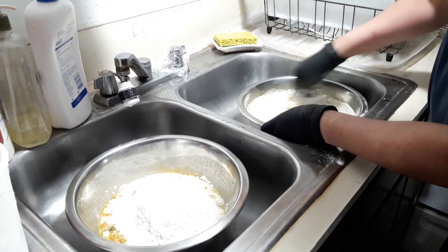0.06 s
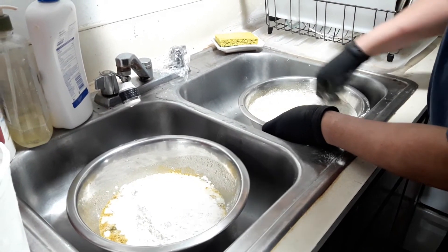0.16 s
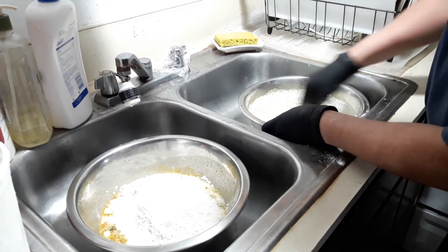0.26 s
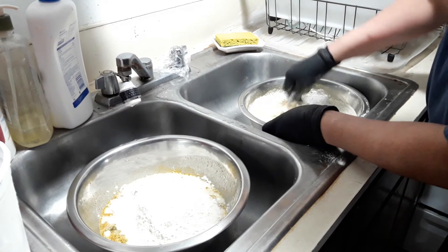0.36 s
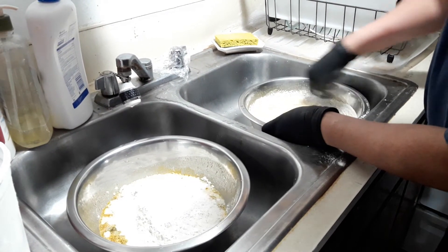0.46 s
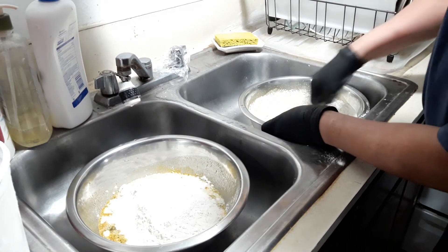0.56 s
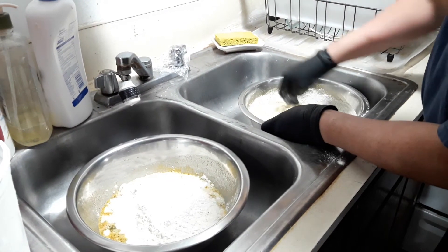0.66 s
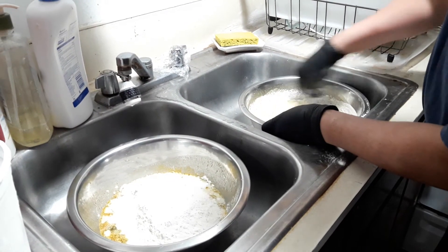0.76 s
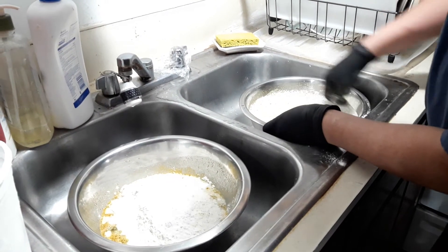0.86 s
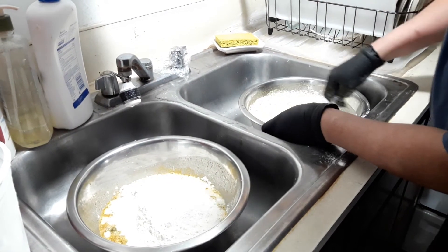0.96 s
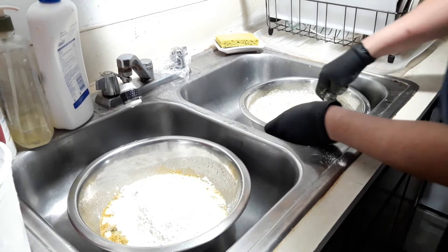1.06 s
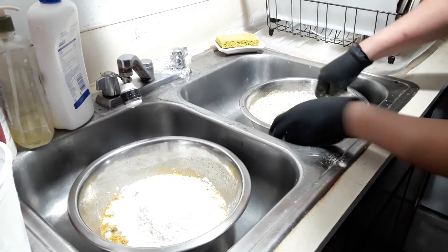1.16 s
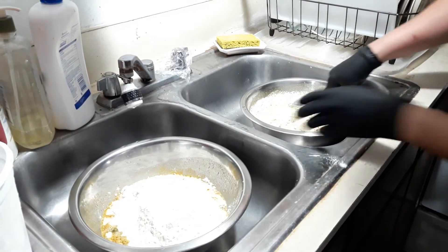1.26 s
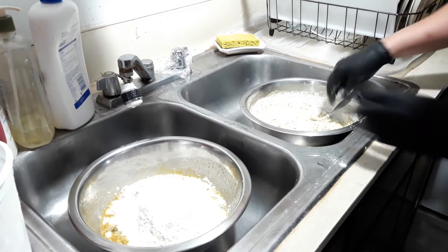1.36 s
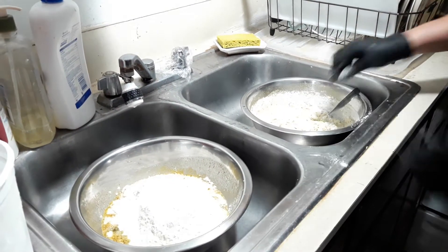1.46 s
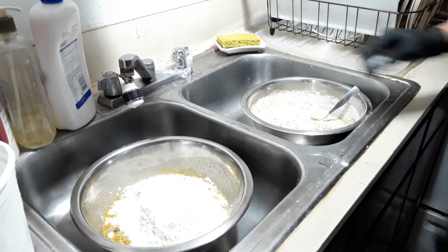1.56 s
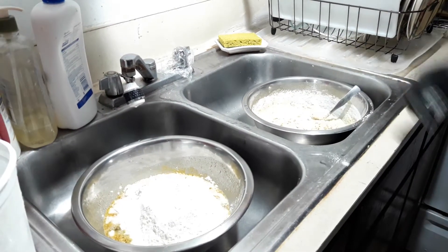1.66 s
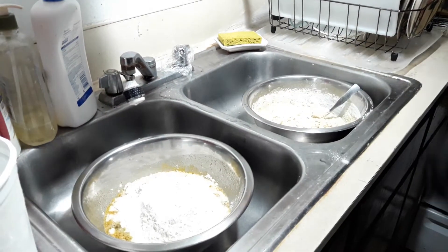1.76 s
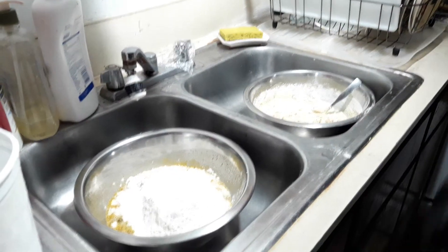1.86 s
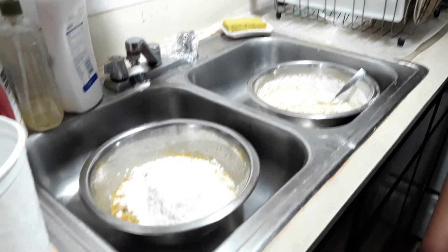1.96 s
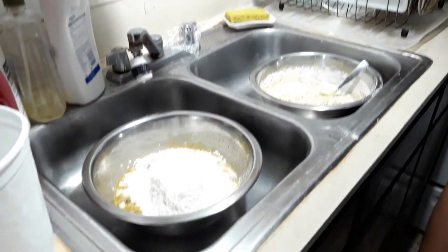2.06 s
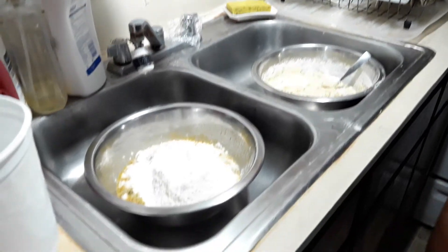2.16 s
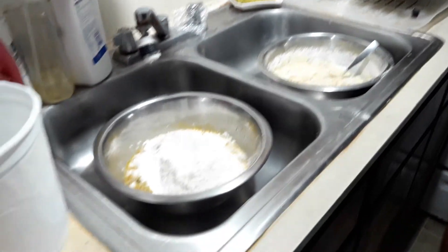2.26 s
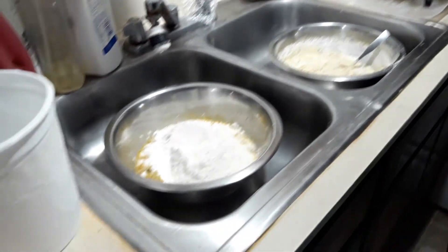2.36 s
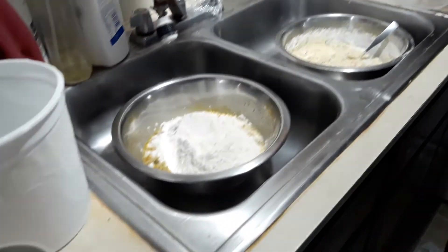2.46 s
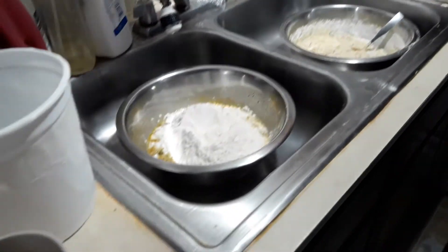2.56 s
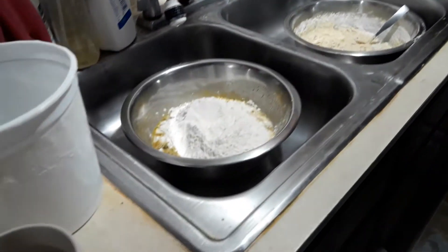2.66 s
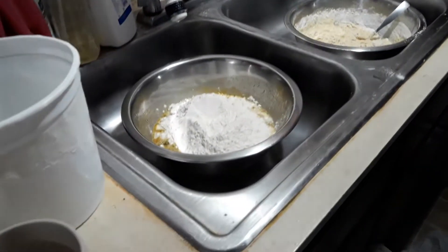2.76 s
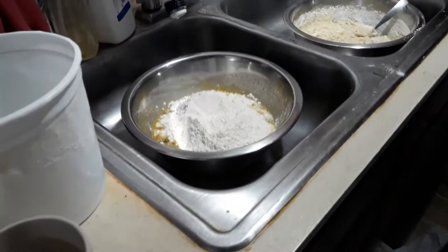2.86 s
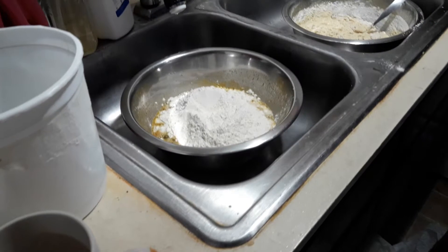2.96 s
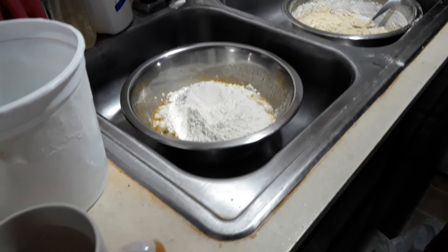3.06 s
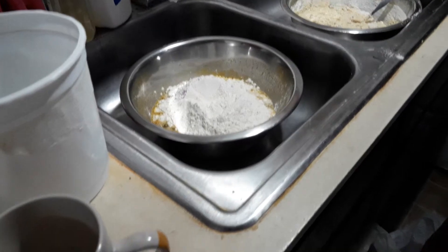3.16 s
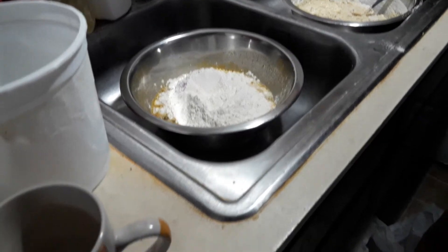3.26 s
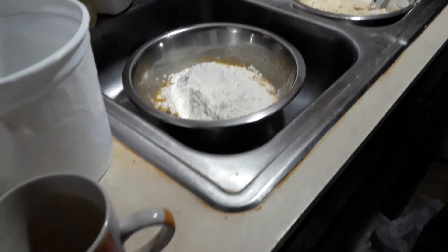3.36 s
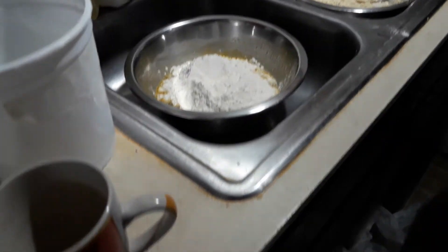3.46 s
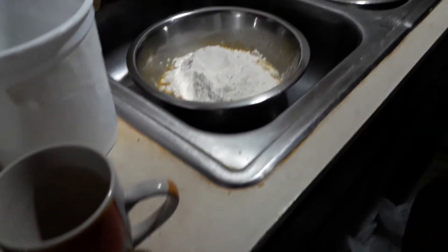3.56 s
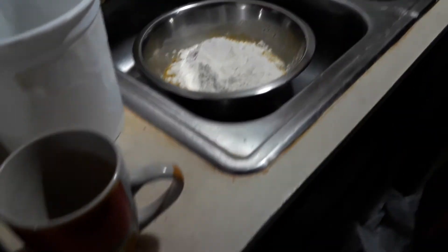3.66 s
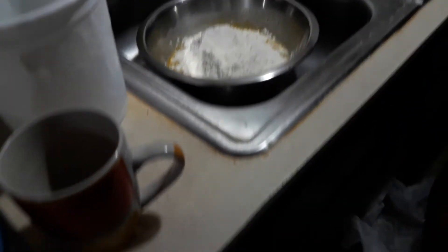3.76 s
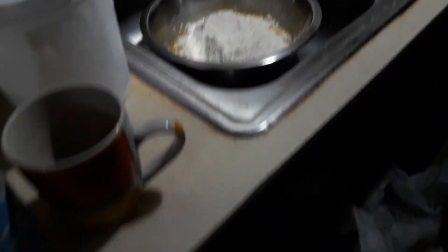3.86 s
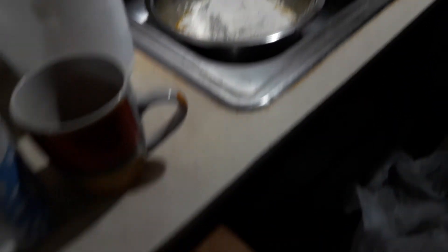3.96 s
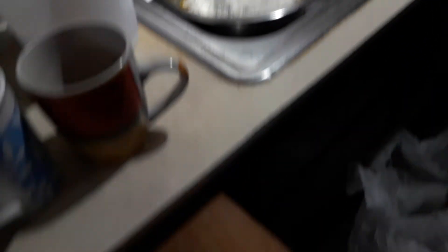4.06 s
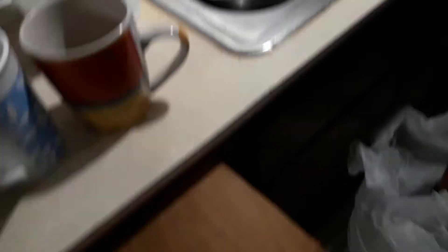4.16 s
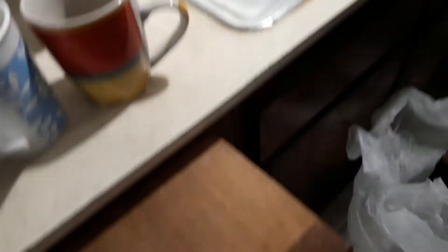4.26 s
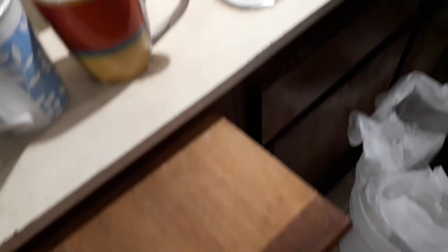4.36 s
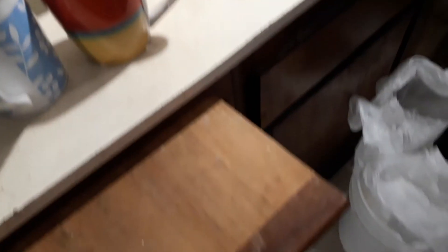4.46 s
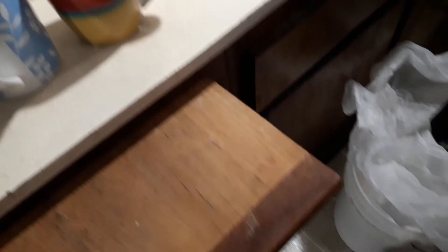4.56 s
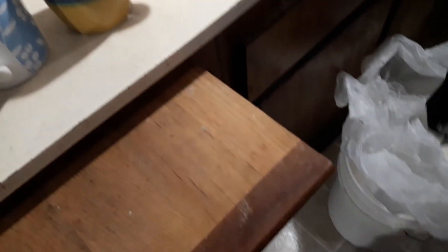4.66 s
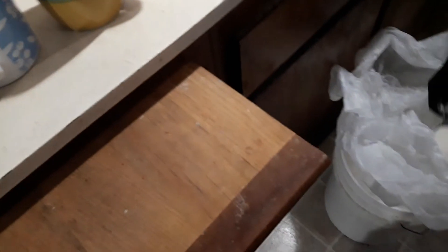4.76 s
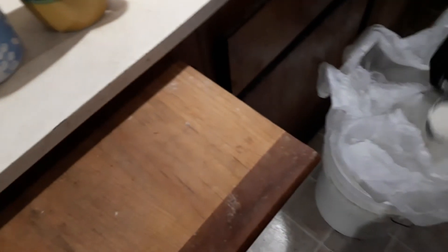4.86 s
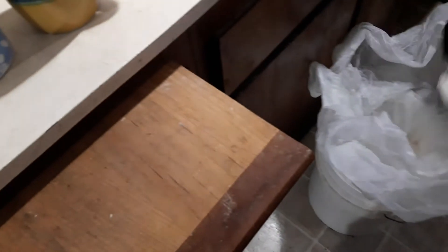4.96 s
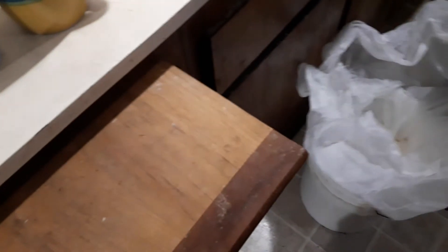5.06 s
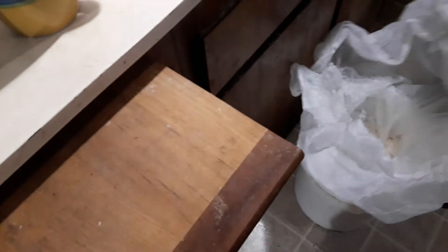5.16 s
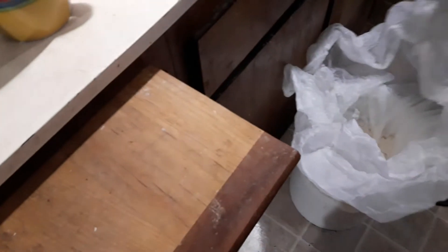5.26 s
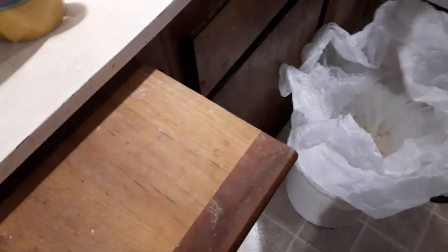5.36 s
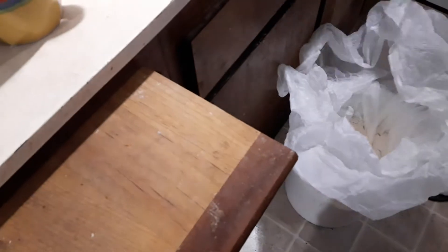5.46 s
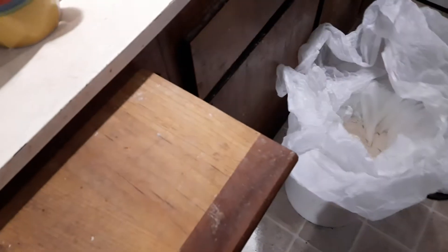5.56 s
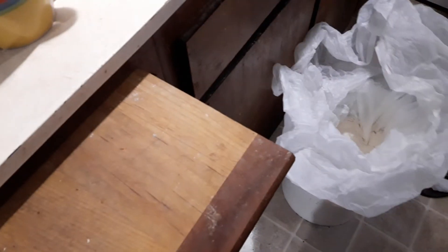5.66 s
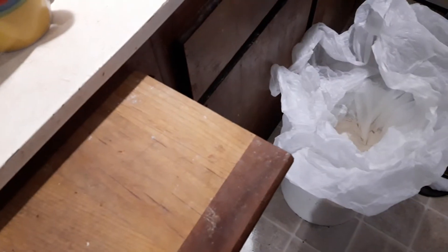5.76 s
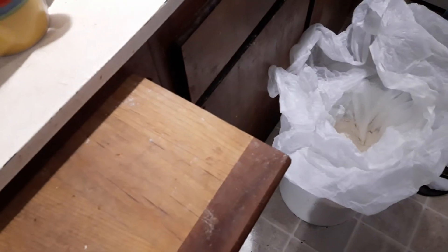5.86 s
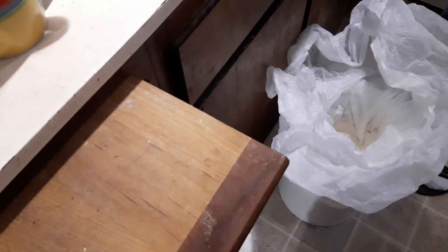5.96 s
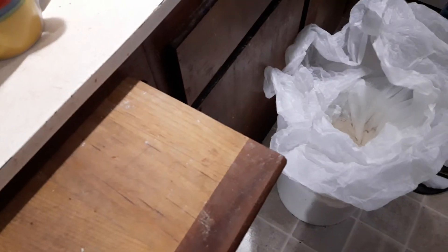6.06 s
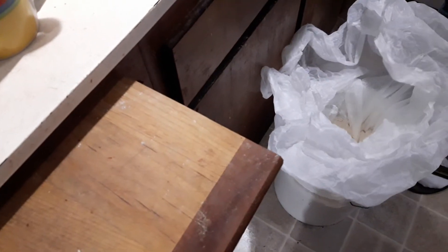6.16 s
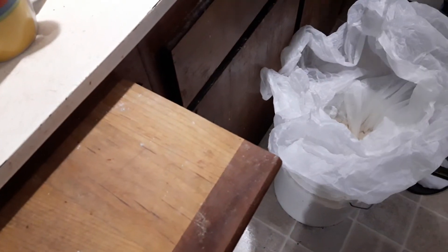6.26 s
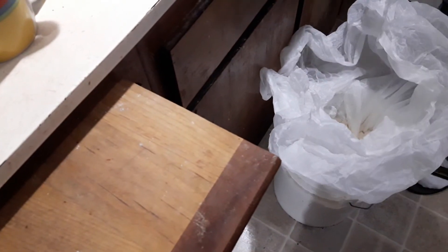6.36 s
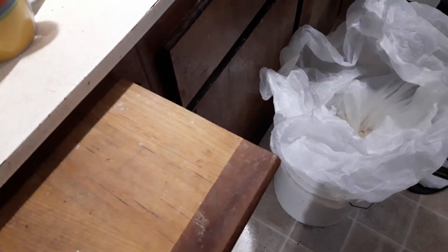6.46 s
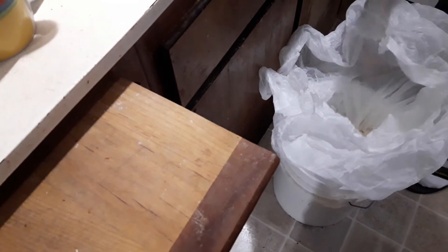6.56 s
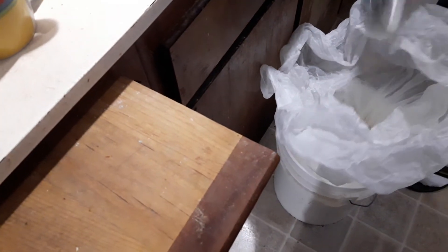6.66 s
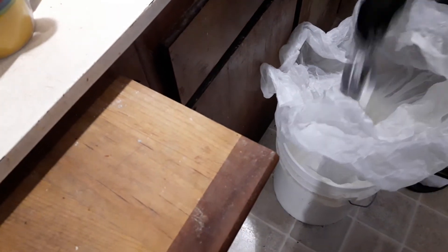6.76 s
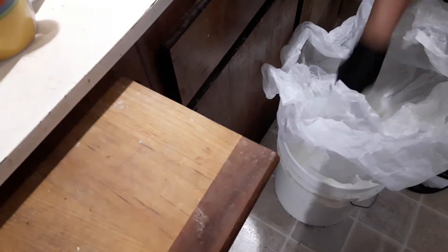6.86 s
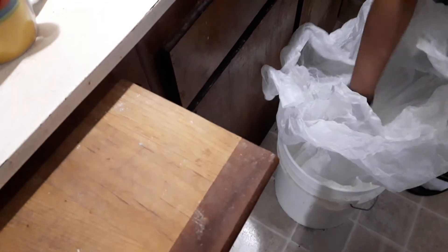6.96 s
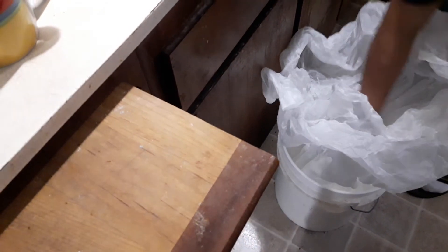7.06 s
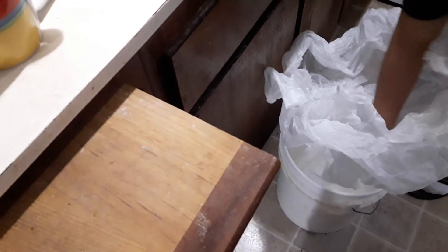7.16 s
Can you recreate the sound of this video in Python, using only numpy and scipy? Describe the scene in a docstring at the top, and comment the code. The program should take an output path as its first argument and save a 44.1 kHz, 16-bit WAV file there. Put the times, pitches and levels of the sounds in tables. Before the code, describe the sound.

A spoon stirs flour in a steel bowl that bumps the sink, drops with a ringing clank, then a thin plastic bag rustles loudly.

```python
"""A fridge hums throughout as steady sine lines over air noise. At first a spoon stirs flour in a steel bowl:
strokes of granular noise, with taps and with bumps of the bowl in a steel sink, both noise bursts and modes.
At about 1.35 s the spoon drops against the rim and the bowl rings. Then a thin plastic bag is pulled open:
its creases rustle and snap as short bursts in bands of noise, with dull thumps beneath."""
import sys
import numpy as np
from scipy import signal
from scipy.fft import rfft, irfft, next_fast_len
from scipy.io import wavfile
from scipy.ndimage import uniform_filter1d

SR = 44100
rng = np.random.default_rng(int(sys.argv[2]) if len(sys.argv) > 2 else 0)


def wav_out(sig):
    """Save sig, one row per channel (or a flat mono array), as 16-bit PCM at SR to the path in sys.argv[1]."""
    wavfile.write(sys.argv[1], SR, np.round(np.clip(np.atleast_2d(sig).T, -1, 1) * 32767).astype(np.int16))


N = 317961

# Lines of the fridge motor. Each row: frequency in Hz, level in dB before wavering and LISTENER_GAIN.
HUM_LINES = [(58.8, -63.5), (77.3, -61.5), (86, -62.5), (118.8, -63), (203.2, -50), (293.7, -54.5),
             (406.7, -56)]
# Hum and air change as the listener moves about. Each row: time in seconds, gain in dB.
LISTENER_GAIN = [(0, 0.5), (1.3, -2.5), (1.6, -3.5), (2.5, -3), (3.5, -2), (4.5, -0.5), (5.5, -2),
                 (7.21, -1)]
# Relative spectrum of the room's air noise. Each row: frequency in Hz, density in dB per Hz.
AIR_SPECTRUM = [(15, -50), (25, -21), (64, 1), (149, -5.5), (206, 7), (344, -1), (405, 2), (575, -10.5),
                (1000, -13), (1400, -40), (4610, -24), (7110, -42.5), (9320, -31), (14000, -66),
                (16000, -39)]
# Dull thumps as the bag and its bucket shift.
# Each row: start in seconds, level before decay in dB, centre frequency in Hz, 60 dB decay time in seconds.
BAG_THUMPS = [(2.724, -51, 250, 0.12), (3.63, -45, 300, 0.35), (3.871, -40.5, 232, .2),
              (4.322, -61, 280, 0.22), (4.621, -47, 308, 0.22), (5.917, -42, 200, 0.13),
              (5.94, -35.5, 129, 0.13), (5.945, -42, 553, 0.19), (6.92, -44, 280, 0.49),
              (6.97, -43, 706, 0.28)]
# The bowl bumps the sink. Each row: start in seconds, boom of the low modes in dB, knock of the others in dB.
BOWL_BUMPS = [(.073, -13, -29.5), (.091, -47, -25.5), (.112, -27, -27), (.197, -29, -25.5),
              (.229, -23, -18), (.25, -31, -27), (.403, -17.5, -25.5), (.57, -24, -19), (.585, -23, -29),
              (.75, -17, -32), (.78, -37, -36), (1.349, -25, -42)]
# Modes of the undamped steel basin.
# Each row: frequency in Hz, relative level in dB, 60 dB decay time in seconds.
SINK_MODES = [(95, -15, .08), (125, -10, .08), (168, 2, .1), (205, -8, .12), (250, -14, .1), (320, -4, .15),
              (352, -5, .15), (404, -8, .16), (480, -6, .14), (572, -4, .12), (612, 0, .12), (657, -6, .14),
              (770, -11, .1), (856, -10, .1), (958, -12, .1), (1060, -17, .08), (1300, -26, .1)]
# The spoon hits the bowl. Each row: start in seconds, crack level before decay in dB,
# crack spectrum at 7800 Hz in dB, ring gain on the bowl modes in dB, spoon clink in Hz.
SPOON_TAPS = [(.073, -41, -25, -62, 2860), (.088, -22, -5.5, -46, 5600), (.196, -27.5, -10, -48, 3200),
              (.231, -33.5, -20, -57, 3070), (0.362, -39, -20, -62, 3440), (.41, -27, -5.5, -53, 5470),
              (.469, -42, -3, -53, 4000), (.571, -38.5, -13, -70, 3320), (.594, -45, -3, -62, 5000),
              (.853, -47, -25, -62, 1310), (0.91, -44, -27, -64, 3320), (1.33, -28, -0.5, -50, 5030),
              (1.347, -13.5, -16, -15, 5310), (1.353, -16, -21, -21, 1280)]
# Modes of the steel bowl. Each row: frequency in Hz, relative level in dB, 60 dB decay time in seconds.
BOWL_MODES = [(651, -9, .22), (850, -11, .18), (923, -11, .16), (1060, -10, .2), (1243, -7, .22),
              (1335, -11, .18), (1507, -11, .16), (1663, -15, .25), (1830, -14, .22), (2169, -15, .18),
              (2511, -12, .14), (2662, -10, .19), (2815, -10, .16), (2931, -10, .14), (3092, -11, .16),
              (3749, -11, .15), (3867, -12, .17), (4080, -10, .14), (4454, -11, .17), (4583, -11, .17),
              (5089, -12, .14), (5165, -7, .2), (5227, -10, .2), (5318, -5, .26), (5410, -10, .2),
              (5501, -7, .24), (5566, -9, .2), (5647, -7, .22), (5892, -3, .22), (5994, -10, .26)]
# Spoon strokes through the flour. Each row: time of full strength in seconds, swell in seconds,
# hold in seconds, mids in dB, added treble in dB.
FLOUR_STROKES = [(0, .1, 0.87, -56, 3.5), (.12, .05, 0.024, -44, -3), (.25, .05, 0.022, -50, -5),
                 (.44, 0.08, 0.029, -45.5, 0), (1.06, 0.24, 0.065, -46, 0), (1.3, .3, 0.16, -51.5, 1),
                 (1.72, 0.15, 0.0033, -53, 1)]
# Tugs at the plastic bag. Each row: time of full strength in seconds, swell in seconds,
# hold in seconds, mids in dB, added treble in dB.
BAG_TUGS = [(1.895, .065, .035, -27.5, -3), (2.14, 0.57, .2, -35, -1), (2.49, 0.33, 0.0052, -36, 0.5),
            (2.72, 0.24, 0, -43.5, 0), (2.82, .3, 0, -48, 1), (2.93, 0.26, 0.19, -50, -0.5),
            (3.25, 0.049, .02, -39, -15), (3.3, .1, 0, -60, 0), (3.34, 0.28, 0.079, -53, 12),
            (3.54, 0.23, 0.19, -42, 3.5), (3.84, 0.23, 0.057, -35.5, -0.5), (4.07, 0.31, 0.19, -39, 1),
            (4.35, 0.15, 0.0063, -34.5, 0), (4.49, 0.17, 0.011, -40, 2.5), (4.75, 0.23, 0, -46, 1),
            (4.83, 0.21, 0.2, -38.5, 3.5), (5.32, 0.33, .05, -46.5, 2.5), (5.55, 0.66, 0.021, -44, 0.5),
            (5.8, 0.38, .03, -56, 1), (6.02, 0.037, 0, -45.5, 2), (6.15, 0.22, 0.022, -41.5, 1.5),
            (6.42, 0.29, 0, -42, 1.5), (6.57, 0.092, 0, -45, 1), (6.68, 0.18, .1, -46, 3.5),
            (6.81, .3, 0.0056, -45, 0), (6.9, 0.28, .26, -37, 1.5)]
# Single creases that snap. Each row: start in seconds, mids in dB, treble against the mids in dB.
CREASE_SNAPS = [(1.701, -46, -13), (1.853, -37, -7), (2.695, -36.5, 0.5), (2.731, -36.5, 2),
                (2.801, -37, -6), (2.913, -36.5, -9), (2.956, -40.5, -11), (3.045, -42, -2),
                (3.066, -44, -7), (3.194, -45, -9), (3.227, -36, -18), (3.251, -32, -24), (3.26, -27, -26),
                (3.324, -36.5, -3.5), (3.451, -44, -11), (3.657, -33, -4), (3.694, -36, -2),
                (3.811, -35, 1), (3.86, -31, 1.5), (3.883, -31, -2), (4.151, -32, -0.5), (4.324, -30, 2),
                (4.782, -42.5, 7.5), (5.244, -44, 3), (5.292, -42, 1), (5.449, -37.5, -4), (5.522, -40, -1),
                (5.665, -39.5, -7), (5.835, -46, -4), (5.996, -46, -4), (6.016, -38, 3), (6.043, -44, -2),
                (6.087, -35, -3), (6.279, -40, -2), (6.338, -39, -5), (6.406, -34, -2), (6.545, -38, -8),
                (6.683, -39, -5), (6.754, -39, -5), (6.871, -37, 3), (7.065, -30, -3.5)]
# Relative spectrum of the rustle. Each row: frequency in Hz, density in dB per Hz.
RUSTLE_SPECTRUM = [(290, 4), (500, -16), (1000, -15), (1500, -14.5), (2600, -1.5), (4500, 5), (6400, -1),
                   (7600, 0), (9500, -12.5), (11600, -4), (12800, -9.5), (14200, -2.5), (16000, -11.5)]
# Low, mid and treble zones of the rustle. Each row: lower edge in Hz, upper edge in Hz.
RUSTLE_ZONES = [(600, 1500), (2000, 7000), (9000, 15500)]

AIR_DB = -50  # before drift and LISTENER_GAIN
KITCHEN_T60_S, KITCHEN_DB = 0.27, -15.5  # tail level before its colouring
GRIT_DB = 2.5  # unevenness of a burst from one instant to the next
BUMP_RISE_S, BUMP_RING_SHARE = 0.0025, 0.8  # rise at 500 Hz; flour damps the ring to this share
CRACK_T60_S = 0.15
SWELL_DB = 25  # rise over the swell time
STROKE_FADE_DB_S, TUG_FADE_DB_S = 83, 97.5
REST_DB = -62  # mids when nothing moves
# A harder rustle gains less in the bag's low mids, more in the treble: (dB at mids of -40 dB, dB per dB)
FLOUR_LOW, BAG_LOW, TREBLE = (-45.5, 1.05), (-54.5, 0.85), (-47, 1.19)
SNAP_LOW_DB = -15.5  # low mids of a snap against its mids
CREST_DB = 2  # how far the first instant of a snap stands above its level
TOP_HZ = 15720


def undb(db):
    """Decibels are a logarithm of amplitude; this inverts it."""
    return 10 ** (np.asarray(db) / 20)


def colour(x, points):
    """Linear filtering: the spectrum is multiplied by a gain through (Hz, dB) points, straight in log frequency."""
    hz, db = np.transpose(points)
    size = next_fast_len(len(x))
    bins = np.maximum(np.arange(size // 2 + 1) * SR / size, 1)
    gain = undb(np.interp(np.log(bins), np.log(hz), db))
    return irfft(rfft(x, size) * gain, size)[:len(x)]


def level(x, db):
    """Root-mean-square scaling sets the effective level."""
    return x * undb(db) / np.sqrt(np.mean(x ** 2))


def fade(x, t60):
    """Exponential decay: every impulse leaves a tail that falls 60 dB in t60 seconds."""
    return signal.lfilter([1], [1, -np.exp(-np.log(1000) / (t60 * SR))], x)


def walk(rate):
    """Slow random modulation: values held for 1 / rate s and smoothed twice, with a spread near 1."""
    k = int(SR / rate)
    held = np.repeat(rng.standard_normal(N // k + 1), k)
    return 1.38 * uniform_filter1d(uniform_filter1d(held, k), k)[:N]


def add(out, s, x):
    """Superposition: a sound that starts at s seconds is summed in."""
    i = int(s * SR)
    out[i:i + len(x)] += x[:N - i]


def ring(modes, rise, scatter_db, detune):
    """Modal response to one blow: decaying sines, each caught a little differently; low modes build up slower."""
    hz, db, t60 = np.transpose(modes)[:, :, None]
    t = np.arange(SR // 4) / SR
    pitch_chance, level_chance, phase_chance = rng.standard_normal((3, len(modes), 1))
    phase = 2 * np.pi * (hz * (1 + detune * pitch_chance) * t + phase_chance)
    tones = np.sin(phase) * undb(db + scatter_db * level_chance - 60 * t / t60)
    build_up = 1 - np.exp(-t * (hz / 500) / rise)  # rise is the time constant in seconds at 500 Hz
    return (tones * build_up).sum(axis=0)


def burst(db, t60, rise, points):
    """Impact noise: coloured, gritty noise under a quick rise and an exponential decay."""
    t = np.arange(SR // 4) / SR
    shape = undb(-60 * t / max(t60, .01)) * (1 - np.exp(-t / rise))
    grit = undb(GRIT_DB * np.repeat(rng.standard_normal(len(t) // 64 + 1), 64)[:len(t)])
    return level(colour(grit * rng.standard_normal(len(t)), points), db) * shape


def fridge():
    """Periodic motor vibration gives sine lines that waver a little, over coloured air noise whose level drifts."""
    t = np.arange(N) / SR
    lines = np.zeros(N)
    for hz, db in HUM_LINES:
        amplitude = np.sqrt(2) * undb(db + 1.9 * walk(5.24))
        cycles = hz * t + 0.12 * walk(2.97)
        lines += amplitude * np.sin(2 * np.pi * cycles)
    air = level(colour(rng.standard_normal(N), AIR_SPECTRUM), AIR_DB) * undb(0.24 * walk(2.8))
    gain_s, gain_db = np.transpose(LISTENER_GAIN)
    return (lines + air) * undb(np.interp(t, gain_s, gain_db))


def kitchen(x):
    """Reverberation of a small hard room: convolution with decaying noise, duller than the direct sound."""
    t = np.arange(SR // 2) / SR
    tail = rng.standard_normal(len(t)) * undb(-60 * t / KITCHEN_T60_S) * (t > .004)
    wet = signal.fftconvolve(x, tail / np.sqrt(np.sum(tail ** 2)))[:N]
    return x + undb(KITCHEN_DB) * colour(wet, [(200, 10.0), (5000, 2.0), (12000, -43)])


def thumps():
    """Soft, heavily damped contacts: the shifting bag and bucket give short bands of dull noise."""
    out = np.zeros(N)
    for s, db, hz, t60 in BAG_THUMPS:
        dull = [(hz / 4, -30), (hz / 1.4, 0), (hz * 1.4, 0), (hz * 2.5, -22), (hz * 20, -80)]
        add(out, s, burst(db, t60, 0.0037, dull))
    return out


def bumps():
    """Modal excitation by soft contact: the basin booms below 260 Hz and its walls knock above, with a rattle."""
    rattle = [(150, -30), (330, -4), (620, 0), (950, -6), (1300, -26), (4000, -55)]
    out = np.zeros(N)
    for s, boom_db, knock_db in BOWL_BUMPS:
        modes = []
        for hz, db, t60 in SINK_MODES:
            blow_db = boom_db if hz < 260 else knock_db
            modes.append((hz, db + blow_db, t60 * BUMP_RING_SHARE))
        add(out, s, ring(modes, BUMP_RISE_S, scatter_db=2, detune=.015))
        add(out, s, burst(knock_db - 5, 0.11, 0.003, rattle))
    return out


def taps():
    """Hard contact excites many modes: a crack of noise for the dense ones, clear bowl modes, a short spoon clink."""
    out = np.zeros(N)
    for s, crack_db, treble_db, ring_db, clink_hz in SPOON_TAPS:
        crack = [(300, -12.5), (1000, 3.5), (3000, 4.5), (6000, 2), (7800, treble_db), (16000, treble_db - 3)]
        add(out, s, burst(crack_db, CRACK_T60_S, 0.00045, crack))
        add(out, s, undb(ring_db) * ring(BOWL_MODES, .008, scatter_db=1.2, detune=.001))
        clink = ring([(clink_hz, 0, .045)], .004, scatter_db=0, detune=0)
        add(out, s, undb(crack_db) * clink)
    return out


def effort(moves, fade_db_s, low):
    """Powers of independent moves add as they swell, hold and fade; the sum sets low mids, mids and treble."""
    s, swell, hold, db, bright_db = np.transpose(moves)[:, :, None]
    t = np.arange(N) / SR
    swell_loss = SWELL_DB * np.maximum(s - t, 0) / swell
    fade_loss = fade_db_s * np.maximum(t - s - hold, 0)
    power = undb(db - swell_loss - fade_loss) ** 2
    total = power.sum(axis=0) + undb(REST_DB) ** 2
    mid_db = 10 * np.log10(total)
    over = mid_db + 40
    brightness = (power * bright_db).sum(axis=0) / total  # the strongest move counts most
    return low[0] + low[1] * over, mid_db, TREBLE[0] + TREBLE[1] * over + brightness


def tilt(hz, low_db, mid_db, treble_db):
    """Spectral interpolation: the level at a frequency is blended from the levels of the three zones."""
    low = np.clip(np.log2(2800 / hz), 0, 1)
    high = np.clip(np.log2(hz / 6000) * 2, 0, 1)
    return low * low_db + high * treble_db + (1 - low - high) * mid_db


def rustle(per_s, spread_db, grain_db, grain_t60, hiss_db, tick_t60, tail_db, tail_t60):
    """Granular noise: random small releases, in flour then plastic, and sharp snaps over an unresolved hiss."""
    first_tug_s, first_swell_s = BAG_TUGS[0][:2]
    stirring = np.arange(N) / SR < first_tug_s - first_swell_s
    flour = effort(FLOUR_STROKES, STROKE_FADE_DB_S, FLOUR_LOW)
    bag = effort(BAG_TUGS, TUG_FADE_DB_S, BAG_LOW)
    effort_db = [np.where(stirring, a, b) for a, b in zip(flour, bag)]
    crease = np.flatnonzero(rng.random(N) < per_s / SR)
    size_db = spread_db * np.minimum(rng.exponential(size=len(crease)), 3.6)
    snap_s, mid_db, bright_db = np.transpose(CREASE_SNAPS)
    snap_db = mid_db + SNAP_LOW_DB, mid_db, mid_db + bright_db
    out = np.zeros(N)
    for hz in 500 * 2 ** np.arange(0, 5.3, .5):  # half-octave bands
        # the treble dies sooner and is more uneven
        quick = (4000 / hz) ** .4
        grains, snaps = np.zeros(N), np.zeros(N)
        # a chance of its own in every band gives each burst its own colour
        grains[crease] = undb(size_db / np.sqrt(quick) + 4.1 * rng.standard_normal(len(crease))) ** 2
        grains = fade(grains, grain_t60 * quick)
        hiss = undb(hiss_db + 1.97 * walk(10)) ** 2
        power = undb(grain_db) ** 2 * grains / grains.mean() + hiss
        power *= undb(tilt(hz, *effort_db)) ** 2
        snap_chance = 1.1 * rng.standard_normal(len(snap_s))
        snaps[(snap_s * SR).astype(int)] = undb(tilt(hz, *snap_db) + snap_chance) ** 2
        power += fade(snaps, tick_t60 * quick) * undb(CREST_DB) ** 2
        power += undb(tail_db) ** 2 * fade(snaps, tail_t60)
        band = [(hz / 2, -60), (hz / 2 ** .25, -3), (hz, 0), (hz * 2 ** .25, -3), (hz * 2, -60)]
        out += colour(np.sqrt(power) * rng.standard_normal(N), band)
    # the spectrum is divided by its power in each zone, so that the moves and snaps set the zone levels
    hz, db = np.transpose(RUSTLE_SPECTRUM)
    grid = np.arange(1, SR / 2)
    density = undb(np.interp(np.log(grid), np.log(hz), db)) ** 2 * 2 / SR  # of filtered unit white noise
    zone_db = [10 * np.log10(density[lo:hi].sum()) for lo, hi in RUSTLE_ZONES]
    return colour(out, [(f, d - tilt(f, *zone_db)) for f, d in RUSTLE_SPECTRUM])


def scene():
    """Superposition: contacts and rustle sound in the room, and the fridge is added without reverberation."""
    moving = rustle(per_s=430, spread_db=4.0, grain_db=-3.0, grain_t60=0.021, hiss_db=-1.0,
                    tick_t60=0.011, tail_db=-8.5, tail_t60=0.048)
    return (fridge() + kitchen(thumps() + bumps() + taps() + moving))[None]


def record(dry):
    """Band limits and soft saturation: the microphone loses deep bass, rounds the loudest peak and cuts the top."""
    thin = signal.sosfilt(signal.butter(2, 55, "high", fs=SR, output="sos"), dry)
    rounded = np.tanh(thin / 1.2) * 1.2
    return signal.sosfilt(signal.ellip(10, .5, 70, TOP_HZ, fs=SR, output="sos"), rounded)


dry = scene()
out = record(dry)
wav_out(out)
```